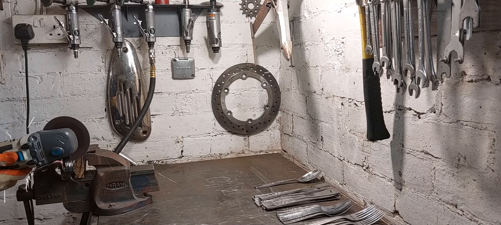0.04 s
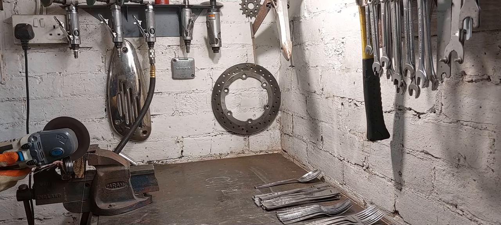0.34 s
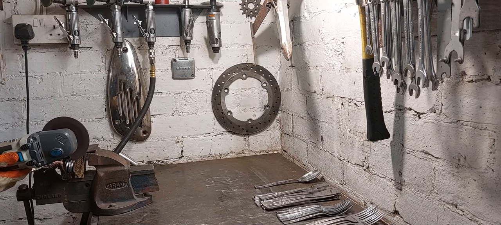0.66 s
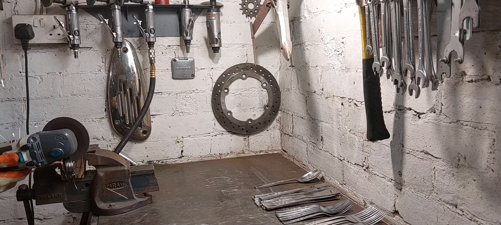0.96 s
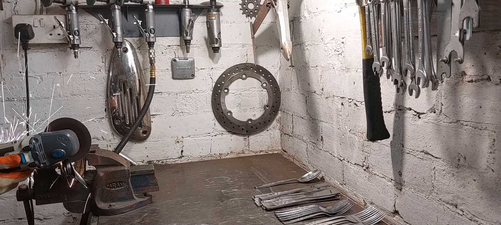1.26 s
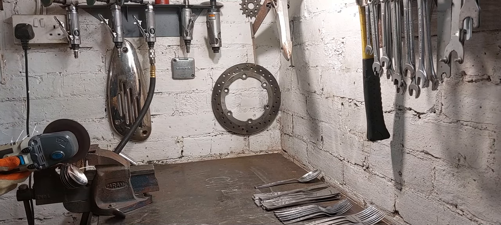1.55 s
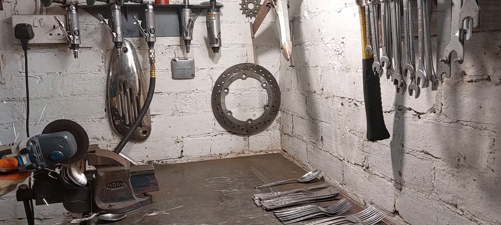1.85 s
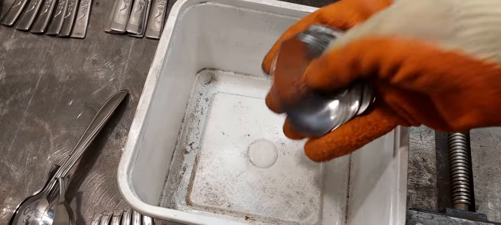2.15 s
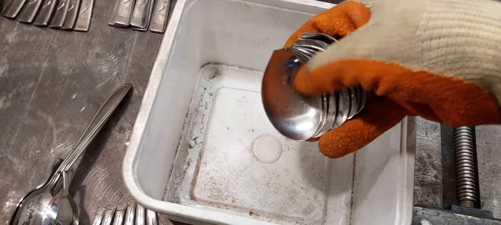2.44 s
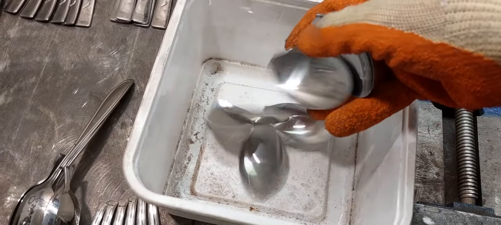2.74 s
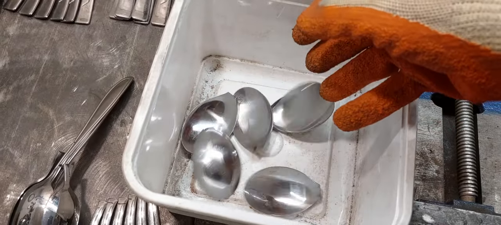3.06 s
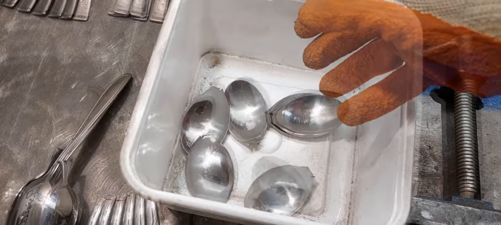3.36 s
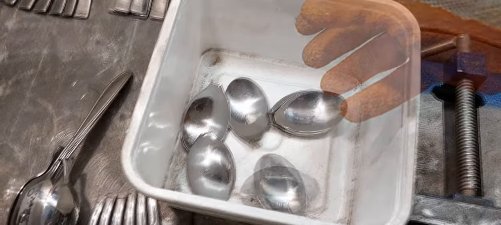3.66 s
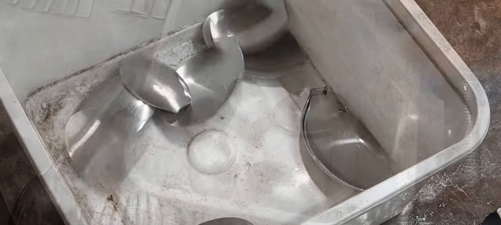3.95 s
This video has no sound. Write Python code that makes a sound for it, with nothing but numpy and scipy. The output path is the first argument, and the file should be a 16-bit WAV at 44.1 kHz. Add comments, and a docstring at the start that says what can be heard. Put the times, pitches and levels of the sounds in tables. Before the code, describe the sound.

An angle grinder cuts steel with a gritty hiss, rasp and low rumble, whistling briefly around 0.5 seconds and stopping dead just before 2. Stacked spoon bowls then scrape and tick softly, close by. From about 2.6 seconds they slide into a plastic tub, knocking hollowly, clinking and ringing, and rock to rest by 3.5. A second batch starts to clatter in at about 3.9 seconds.

```python
"""Angle grinder and spoon bowls

An angle grinder hisses, rasps and rumbles through spoon necks in a small brick workshop, then stops dead.
A gloved hand shifts a stack of steel spoon bowls and lets them slide into a plastic tub: they knock
its floor, clink, rattle and rock to rest. A second batch lands at the very end."""
import sys
import numpy as np
from scipy import signal
from scipy.fft import rfft, irfft, next_fast_len
from scipy.io import wavfile
from scipy.ndimage import uniform_filter1d, map_coordinates

SR = 44100
rng = np.random.default_rng(int(sys.argv[2]) if len(sys.argv) > 2 else 0)


def unload_wav(signal):
    """Save mono or channel-first audio to the path in sys.argv[1] as 16-bit WAV at rate SR, clipped to [-1, 1]."""
    wavfile.write(
        sys.argv[1],
        SR,
        np.round(np.clip(np.atleast_2d(signal).T, -1, 1) * 32767).astype(np.int16),
    )


N = 176400
T = np.arange(N) / SR
TAIL = T[:SR // 4]  # time axis of one hit

# each spoon bowl by name: (six mode frequencies [Hz])
BOWL_PITCHES = {"A": (2320, 5399, 9275, 9722, 13819, 14303), "B": (2428, 5518, 9448, 9948, 14077, 14626),
                "C": (2573, 5835, 9830, 10094, 14438, 14766), "D": (2500, 5700, 9480, 10185, 14130, 14900)}
# those six modes, alike in all bowls: (level struck [dB], level skidding [dB], t60 [s])
BOWL_MODES = [(-9, -2, .09), (-6.5, -3, .2), (-3, -4.5, .28), (-3, -4.5, .28), (0, -1, .25), (.5, 0, .25)]
# tone of a steel-on-steel click: (frequency [Hz], level [dB])
CLICK_SPECTRUM = [(300, -32), (1200, -13), (2500, -12.5), (3300, -4.5), (7500, 0), (8700, -10), (10500, 0),
                  (12800, -1), (14300, 5), (15700, -9)]
# tone of the plastic tub's thud: (frequency [Hz], level [dB])
THUD_SPECTRUM = [(25, -10), (65, 4), (350, 1), (550, -3), (950, -8.5), (1400, -6), (4000, -19),
                 (9000, -30.5)]
# bowls landing on the tub's floor: (time [s], level [dB])
LANDINGS = [(2.735, -13), (2.743, -19.5), (2.8, -19), (2.808, -19.5), (2.833, -22.5), (2.878, -24),
            (2.968, -22), (3.001, -21), (3.153, -24.5), (3.17, -25), (3.195, -23.5), (3.219, -26.5),
            (3.906, -26.5), (3.911, -19), (3.921, -29.5)]
# rustle of the next stack being picked up: (time [s], level [dB])
NEXT_STACK = [(3.745, -64), (3.8, -68), (3.835, -60), (3.899, -72)]


def amp(db):
    return 10 ** (np.asarray(db) / 20)


def unit(x):
    return x / np.sqrt(np.mean(x ** 2) + 1e-20)


def along(points, hz):
    """Read (frequency, value) points on a log frequency axis."""
    freqs, values = np.transpose(points)
    return np.interp(np.log(hz + 1), np.log(freqs), values)


def curves(rows):
    """One automation curve for each column after the time."""
    times, *columns = np.transpose(rows)
    return [np.interp(T, times, column) for column in columns]


def wobble(per_s):
    """A smooth random curve with per_s knots a second."""
    return map_coordinates(rng.standard_normal(int(4 * per_s) + 4), [T * per_s])


def pan(db):
    """Left and right gains, the left louder by db."""
    return amp(np.array([[.5], [-.5]]) * db)


def add(out, s, sound):
    """Mix a sound in at time s."""
    part = out[:, round(s * SR):][:, :sound.shape[-1]]
    part += sound[..., :part.shape[1]]


def filtered(x, response):
    """Equalise x with a gain that is a function of frequency."""
    n = x.shape[-1]
    padded = next_fast_len(n + 8192)
    return irfft(rfft(x, padded) * response(np.fft.rfftfreq(padded, 1 / SR)), padded)[..., :n]


def noise(spectrum, size=N):
    """Wide coloured stereo noise (rms 1), a little narrower in the bass."""
    # stereo likeness: (frequency [Hz], left-right correlation [-1..1])
    correlation = [(1200, 0.13), (2500, 0.02)]

    def mid_side_gains(hz):
        angle = np.arccos(along(correlation, hz)) / 2
        return amp(along(spectrum, hz)) * [np.cos(angle), np.sin(angle)]
    mid, side = filtered(rng.standard_normal((2, size)), mid_side_gains)
    return unit(np.array([mid + side, mid - side]))


def peaky(x, depth_db=5):
    """Give noise narrow resonances that come and go as the points of contact move."""
    bins = signal.stft(x, nperseg=512)[2]
    peaks = uniform_filter1d(rng.standard_normal(bins.shape[1:]), size=2, axis=0)
    peaks = uniform_filter1d(peaks, size=7, axis=1)
    gain = amp(depth_db * np.clip(unit(peaks), -2, 2))
    return unit(signal.istft(bins * gain, nperseg=512)[1][:, :x.shape[1]])


def grains(per_s, life_s, scatter_db):
    """Envelope (rms 1) of small random contacts."""
    hits = (rng.random(N) < per_s / SR) * amp(scatter_db * np.clip(rng.standard_normal(N), -2, 2))
    power = signal.fftconvolve(hits ** 2, np.exp(-2 * TAIL / life_s))[:N]
    return unit(np.sqrt(np.abs(power)))


def burst(spectrum, t60):
    """One contact: many close, quickly dying resonances."""
    return peaky(noise(spectrum, size=len(TAIL))) * amp(-60 * TAIL / t60)


def ring(modes, spread_rad, scatter_db, smear_hz=9):
    """Damped, slightly wavering modes, each with its own level and phase left and right."""
    out = np.zeros((2, len(TAIL)))
    for hz, db, t60 in modes:
        envelope = amp(db + scatter_db * rng.standard_normal((2, 1)) - 60 * TAIL / t60)
        waver = np.cumsum(rng.standard_normal(len(TAIL))) * np.sqrt(2 * np.pi * smear_hz / SR)
        out += envelope * np.sin(2 * np.pi * hz * TAIL + waver + spread_rad * rng.standard_normal((2, 1)))
    return out


def room_tone():
    """A faint, dark bed of steady noise."""
    # tone of the bed: (frequency [Hz], level [dB])
    spectrum = [(25, 0.5), (120, 5.5), (1000, -16), (15000, -30.5)]
    return amp(-76.5) * noise(spectrum)


def reflections(x, t60=.14):
    """Short reflections from the tub's sides and the brick walls."""
    tail = rng.standard_normal((2, len(TAIL))) * amp(-60 * TAIL / t60) * (TAIL > .002)
    return signal.fftconvolve(x, tail / np.linalg.norm(tail[0]), axes=1)[:, :N]


def free_rings(buzz_db=4.5, buzz_rad=1.5):
    """Barely supported steel sings on faintly, and buzzes once the next stack is handled."""
    # pieces left ringing: (time [s], frequency [Hz], level [dB], t60 [s])
    rings = [(3.22, 5399, -42, .9), (3.333, 2320, -58, 1), (3.749, 5265, -65, 3), (3.749, 4673, -70, 3),
             (3.749, 11504, -72, 3), (3.749, 10750, -77, 3)]
    out, buzzing = np.zeros((2, N)), T > NEXT_STACK[0][0]
    for s, hz, db, t60 in rings:
        left, right, flutter = (buzzing * wobble(130) for _ in range(3))
        phase = 2 * np.pi * hz * T + buzz_rad * np.array([left, right])
        add(out, s, amp(db - 60 * T / t60 + buzz_db * flutter) * np.sin(phase))
    return out


def whine(peak_s=.56, width_s=.17, rise_per_s=.09):
    """The spinning disc whines briefly, rising a little, as the load on the disc eases."""
    # the disc's two whining tones: (frequency [Hz], level [dB])
    tones = [(2190, -53), (5430, -58)]
    swell = np.exp(-((T - peak_s) / width_s) ** 2)
    glide = np.cumsum(1 + rise_per_s * (T - peak_s)) / SR
    waver = np.array([wobble(70), wobble(70)])
    return swell * sum(amp(db) * np.sin(2 * np.pi * hz * glide + waver) for hz, db in tones)


def grinder(disc_hz=188.8, rasp_hz=2952, rasp_damping_hz=270, stop_s=1.948):
    """Grit tears at the steel, harder once each turn of the disc; the spoon rasps and the vice rumbles."""
    # course of the cut: (time [s], hiss level [dB], rumble level [dB])
    cut = [(0, -42, -53), (.2, -41, -50.5), (.47, -44, -59.5), (.8, -41.5, -52), (1.1, -41, -50.5),
           (1.2, -39.5, -46), (1.52, -43, -49.5), (1.68, -43.5, -45), (1.85, -43, -51)]
    # tone of the grit on steel: (frequency [Hz], level [dB])
    hiss_spectrum = [(500, -15), (1300, -5), (2200, -2.5), (4500, -5), (6300, -9), (7800, -2), (9400, -8.5),
                     (12000, -4.5), (15500, -2)]
    # placement of the hiss: (frequency [Hz], left minus right [dB])
    hiss_pan = [(1500, 0), (3200, -3), (8300, 1.5), (9500, -2), (15000, -2)]
    # tone of the shaking vice: (frequency [Hz], level [dB])
    rumble_spectrum = [(25, -11.5), (80, 3), (130, -1.5), (300, -0.5), (1400, -8.5), (3000, -11.5)]
    hiss_db, rumble_db = curves(cut)
    turns = np.cumsum(disc_hz * (1 + .0043 * wobble(4))) / SR
    bite = (1 + .22 * np.cos(2 * np.pi * turns)) * amp(.93 * wobble(24.42))
    grit = lambda: noise([(20, 0), (16000, 0)]) * grains(7000, life_s=.0007, scatter_db=3) * bite
    hiss = unit(filtered(grit(), lambda hz: amp(along(hiss_spectrum, hz)) * pan(along(hiss_pan, hz))))
    resonance = lambda hz: (hz / (rasp_hz ** 2 - hz ** 2 + 2j * hz * rasp_damping_hz)) ** 2
    rasp = unit(filtered(grit(), resonance))
    # the rasp swells with the pressure that also shakes the vice
    rasp_db = -47 + .4 * (rumble_db - np.mean(cut, axis=0)[2]) + wobble(20)
    rumble = noise(rumble_spectrum) * pan(db=6.5) * amp(2.25 * wobble(29.78))
    cutting = amp(hiss_db + 4) * hiss + amp(rasp_db) * rasp + amp(rumble_db + 4.5) * rumble
    return cutting * np.clip((stop_s - T) / .0011, 0, 1)


def stack():
    """Nested bowls scrape and tick, damped by the glove, and sound fuller as they slide free."""
    # the stack shifting in the glove: (time [s], level [dB])
    shift = [(2.1, -67), (2.155, -52.5), (2.181, -37), (2.2, -56), (2.27, -48), (2.305, -63.5),
             (2.318, -38.5), (2.338, -73), (2.356, -46), (2.41, -92)]
    # tone of the gloved scrape: (frequency [Hz], level [dB])
    scrape_spectrum = [(200, -22.5), (1600, -10.5), (2500, -5), (3800, 3.5), (5500, 1), (7500, 2.5),
                       (9000, -6.5), (11500, 1), (13500, -1.5)]
    # the stack sliding out: (time [s], level [dB])
    slide = [(2.566, -67.5), (2.595, -40), (2.625, -47.5), (2.675, -33), (2.74, -35.5)]
    # tone of the slide: (frequency [Hz], level [dB])
    slide_spectrum = [(400, -20), (850, -11.5), (1400, -7), (2100, -17), (2450, -1), (4700, 3.5),
                      (5700, 7.5), (8800, -1.5), (14400, 1.5)]
    # light ticks of steel: (time [s], level [dB])
    ticks = [(1.987, -56), (2.104, -47.5), (2.161, -39), (2.179, -34), (2.311, -37.5), (2.351, -44.5),
             (2.522, -53), (3.75, -55.5)]
    envelope = lambda move: amp(curves(move)[0]) * (T > move[0][0]) * (T < move[-1][0])
    held = peaky(noise(scrape_spectrum)) * (envelope(shift) + envelope(NEXT_STACK))
    sliding = peaky(noise(slide_spectrum)) * envelope(slide)
    out = (held + sliding) * grains(500, life_s=.011, scatter_db=3.5)
    for s, db in ticks:
        add(out, s, amp(db) * burst(scrape_spectrum, t60=.031))
    return out


def skids(start_s, per_s, t60=.045, detune_hz=45):
    """Dense light contacts (rms 1), each ringing one bowl briefly at a shifted pitch."""
    out, t = np.zeros((2, N)), TAIL[TAIL < t60]
    bowls, skid_db = np.array(list(BOWL_PITCHES.values())), np.array(BOWL_MODES)[:, 1]
    for s in rng.uniform(start_s, T[-1], int(per_s * (T[-1] - start_s))):
        hz = rng.choice(bowls) + detune_hz * rng.standard_normal(len(skid_db))
        gains = amp(skid_db) * rng.standard_normal((2, len(skid_db)))
        add(out, s, gains @ np.sin(2 * np.pi * np.outer(hz, t)) * amp(-60 * t / t60))
    return out / out[:, T > start_s].std()


def tumble(contacts_per_s=260):
    """Bowls skid and rock: small contacts ring them briefly and, once they land, rattle the tub."""
    # swell and fall of the tumbling: (time [s], level [dB])
    motion = [(2.58, -62), (2.62, -66), (2.67, -43.5), (2.72, -54), (2.8, -38), (2.92, -30), (3.06, -33),
              (3.13, -27), (3.229, -36), (3.325, -44.5), (3.355, -37), (3.43, -53), (3.51, -49.5),
              (3.58, -77), (3.89, -110.5), (3.92, -39.5), (4, -34.5)]
    contacts = grains(contacts_per_s, life_s=.007, scatter_db=4)
    steel = amp(-7) * peaky(noise(CLICK_SPECTRUM))
    plastic = amp(-4) * noise(THUD_SPECTRUM) * (T > LANDINGS[0][0])
    ringing = amp(3) * skids(motion[0][0], contacts_per_s)
    return amp(curves(motion)[0]) * (contacts * (steel + plastic) + ringing)


def tub_knocks(hard_db=-18):
    """The plastic floor answers each landing with a knock, brighter and more hollow when hit hard."""
    # the tub's hollow modes: (frequency [Hz], level [dB], t60 [s])
    tub_modes = [(270, -11, .06), (388, 0, .14), (598, -12, .08), (797, -12, .08), (1430, -11, .06)]
    out, hardest_db = np.zeros((2, N)), max(db for _, db in LANDINGS)
    for s, db in LANDINGS:
        db_per_octave = .27 * max(db - hard_db, 0)
        spectrum = [(hz, level + db_per_octave * np.log2(hz)) for hz, level in THUD_SPECTRUM]
        hollow = amp(-6.5 + .5 * (db - hardest_db)) * ring(tub_modes, spread_rad=.5, scatter_db=2)
        thud = amp(-1.5) * burst(spectrum, t60=.072)
        add(out, s, amp(db) * (thud + hollow))
    return out * pan(db=2)


def bowl(pitches, where, detune_hz=15, rim_db=8, swell_s=.004, choke_s=.14):
    """A struck bowl: touching neighbours shift its modes, and a rim blow favours the lowest one."""
    modes = []
    for hz, (db, _, t60) in zip(pitches, BOWL_MODES):
        boost_db = rim_db * (where == "rim" and hz == min(pitches))
        modes.append((hz + detune_hz * rng.standard_normal(), db + boost_db, t60))
    envelope = (1 - np.exp(-TAIL / swell_s)) * np.exp(-(TAIL / choke_s) ** 2)
    return ring(modes, spread_rad=2, scatter_db=1) * envelope


def clinks(rebound_within_s=.03, rebound_db=-11):
    """Each collision clicks, rings one bowl and rebounds once."""
    # steel on steel: (time [s], click level [dB], ring level [dB], bowl [name], spot [back or rim])
    collisions = [(2.631, -33.5, -48, "B", "back"), (2.657, -28.5, -33, "D", "back"),
                  (2.668, -23.5, -32.5, "B", "back"), (2.7425, -20, -28.5, "A", "back"),
                  (2.7645, -26, -22.5, "A", "back"), (2.796, -21, -25.5, "B", "back"),
                  (2.809, -21.5, -23, "C", "back"), (2.83, -27.5, -23, "A", "back"),
                  (2.85, -27, -21.5, "B", "back"), (2.885, -28.5, -28.5, "A", "back"),
                  (2.917, -32.5, -26.5, "B", "rim"), (2.936, -25.5, -25, "C", "back"),
                  (2.966, -23, -24, "A", "rim"), (3.0004, -23.5, -23, "B", "back"),
                  (3.075, -23, -21, "C", "back"), (3.1245, -19.5, -24.5, "C", "rim"),
                  (3.138, -28, -24, "B", "rim"), (3.156, -26.5, -22.5, "A", "back"),
                  (3.208, -19.5, -25.5, "A", "back"), (3.22, -18.5, -29.5, "D", "back"),
                  (3.3327, -28.5, -29.5, "B", "back"), (3.384, -32, -42, "D", "back"),
                  (3.4808, -35.5, -56.5, "A", "back"), (3.541, -54, -74, "B", "back"),
                  (3.905, -24, -27, "B", "back"), (3.93, -23.5, -35, "A", "back"),
                  (3.984, -26, -27.5, "C", "rim")]
    out = np.zeros((2, N))
    for s, click_db, ring_db, name, where in collisions:
        for delay, db in [(0, 0), (rebound_within_s * rng.random(), rebound_db)]:
            click = amp(click_db) * burst(CLICK_SPECTRUM, t60=.055)
            ringing = amp(ring_db) * bowl(BOWL_PITCHES[name], where)
            add(out, s + delay, amp(db) * (click + ringing))
    return out


def scene():
    """The grinder first, then the spoons close by in the small room, over faint room tone."""
    spoons = (stack() + clinks() + tub_knocks() + tumble()) * pan(db=1)
    return grinder() + whine() + spoons + amp(-4.5) * reflections(spoons) + free_rings() + room_tone()


def record(dry, top_hz=15800):
    """A steep low-pass takes off the highest treble."""
    return filtered(dry, lambda hz: np.clip((top_hz - hz) / 100, 0, 1))


dry = scene()
out = record(dry)
unload_wav(out)
```